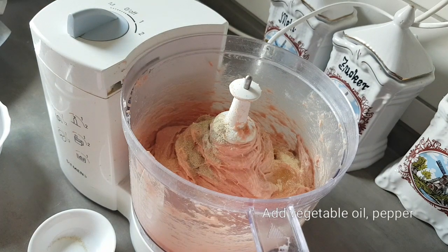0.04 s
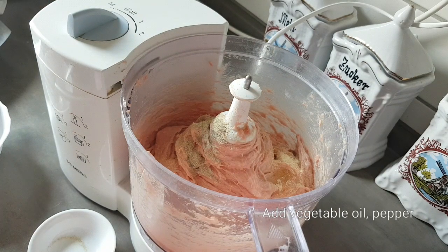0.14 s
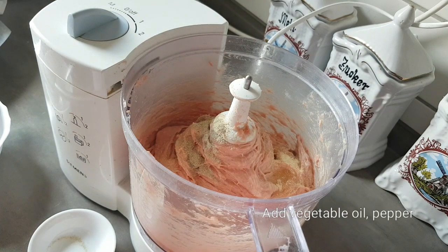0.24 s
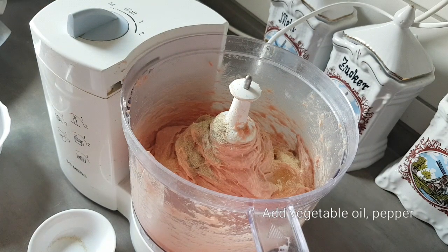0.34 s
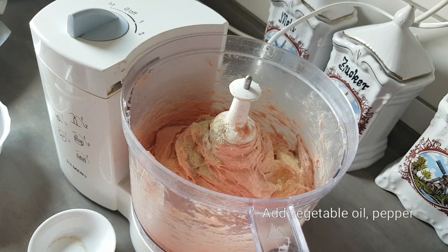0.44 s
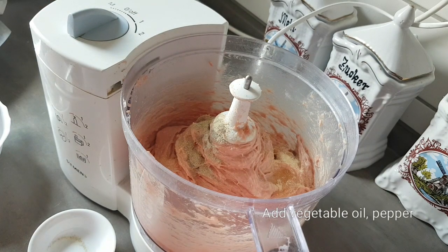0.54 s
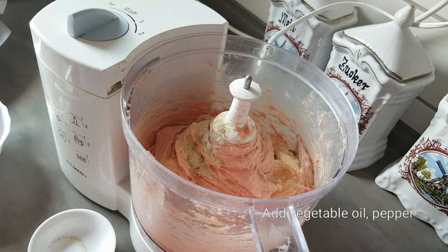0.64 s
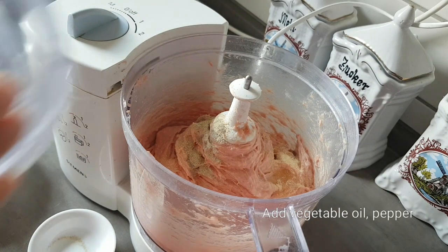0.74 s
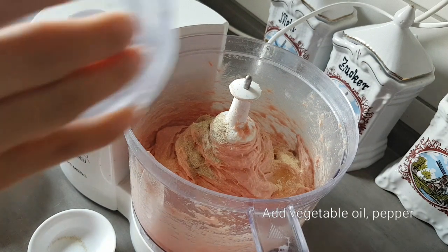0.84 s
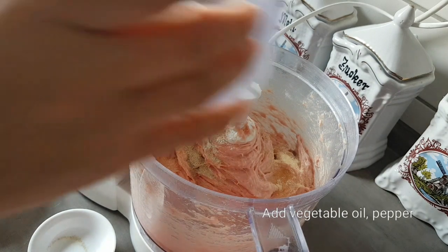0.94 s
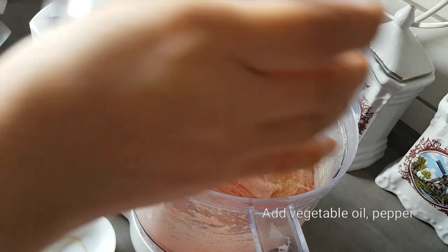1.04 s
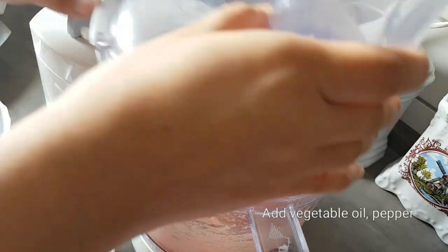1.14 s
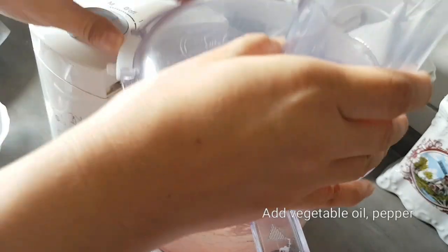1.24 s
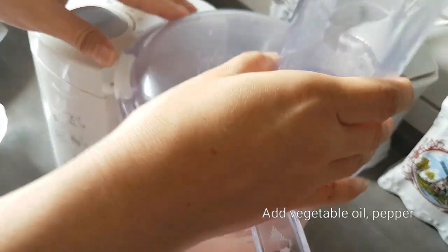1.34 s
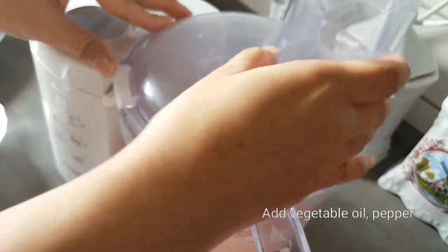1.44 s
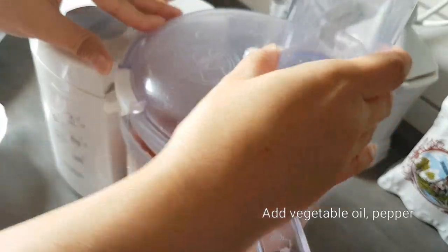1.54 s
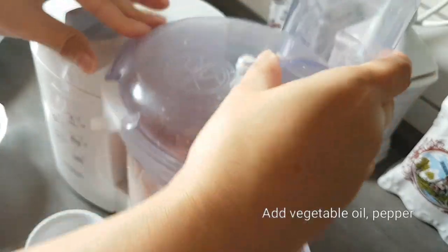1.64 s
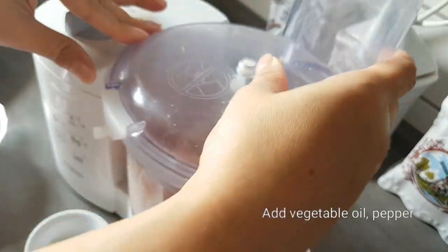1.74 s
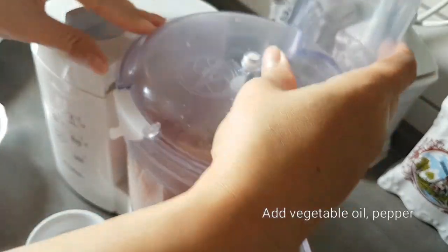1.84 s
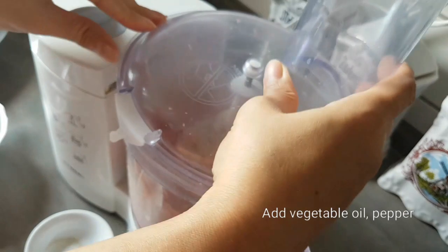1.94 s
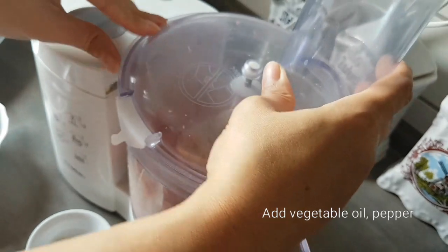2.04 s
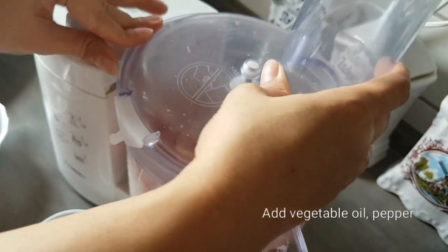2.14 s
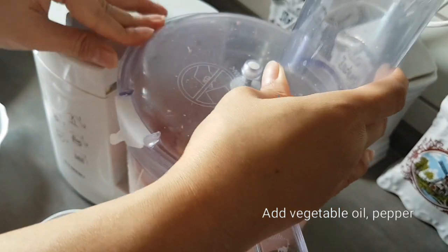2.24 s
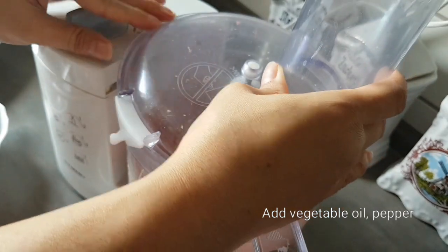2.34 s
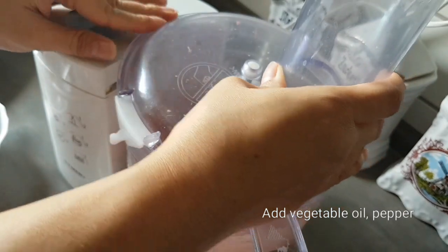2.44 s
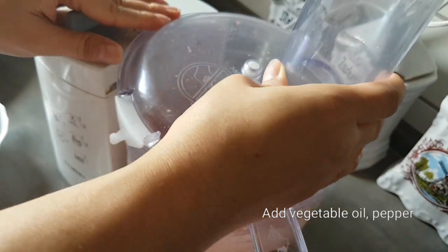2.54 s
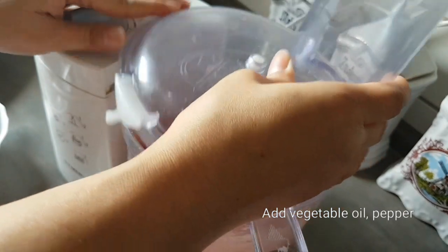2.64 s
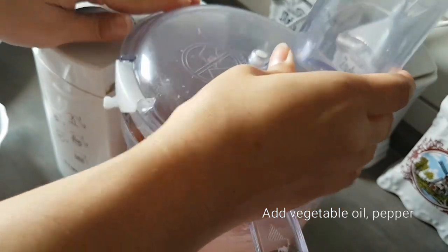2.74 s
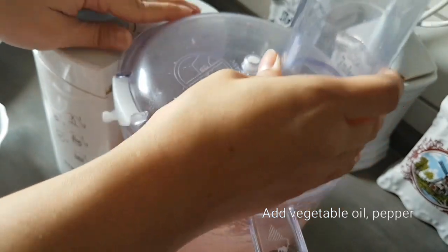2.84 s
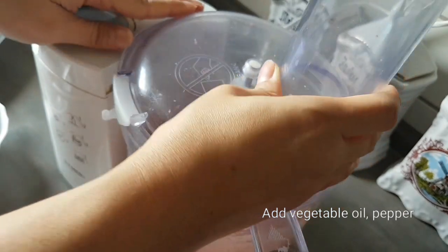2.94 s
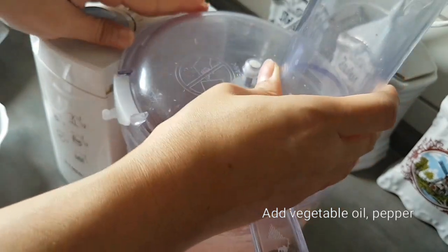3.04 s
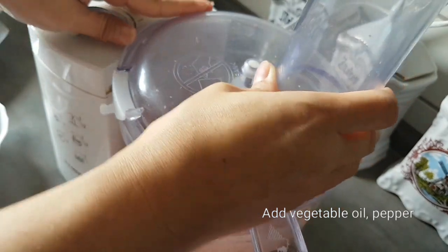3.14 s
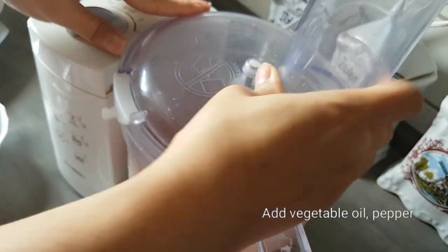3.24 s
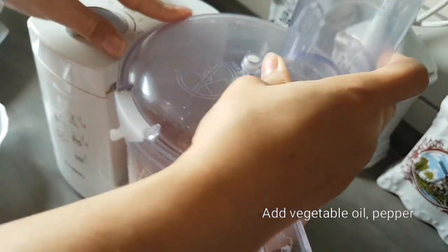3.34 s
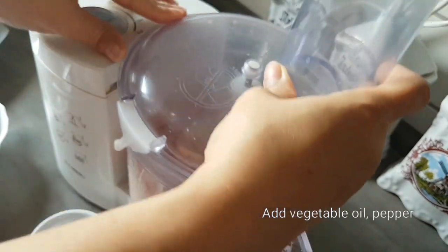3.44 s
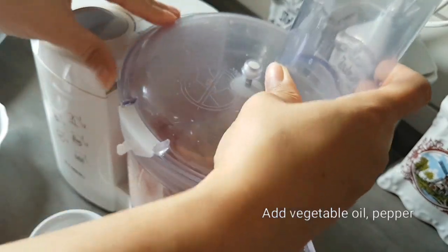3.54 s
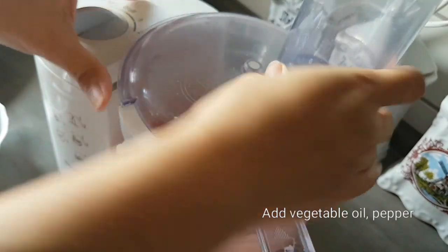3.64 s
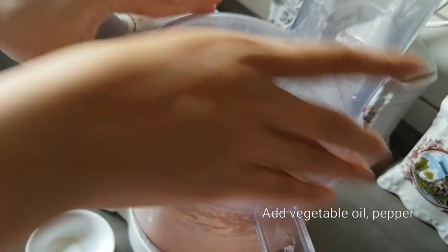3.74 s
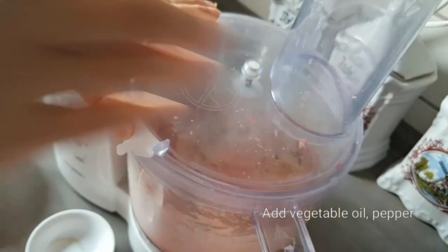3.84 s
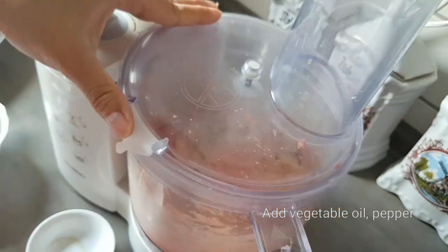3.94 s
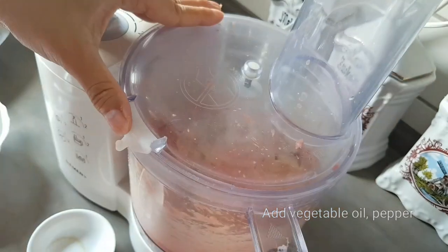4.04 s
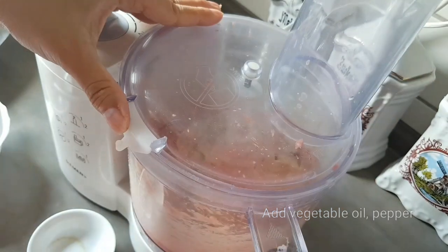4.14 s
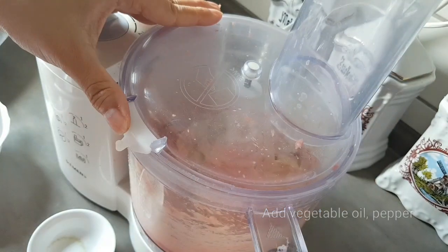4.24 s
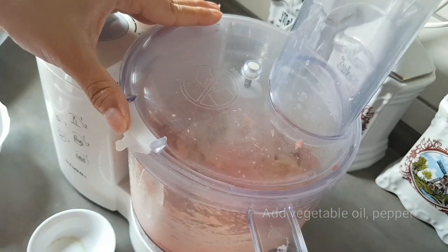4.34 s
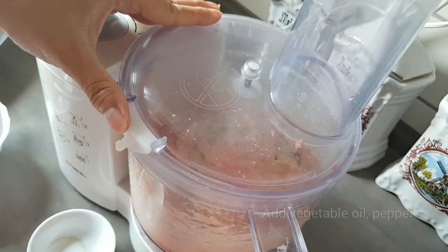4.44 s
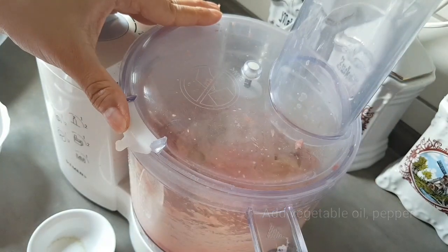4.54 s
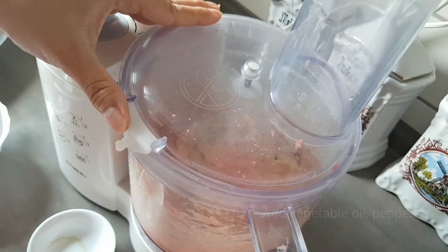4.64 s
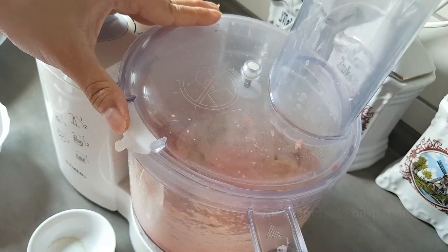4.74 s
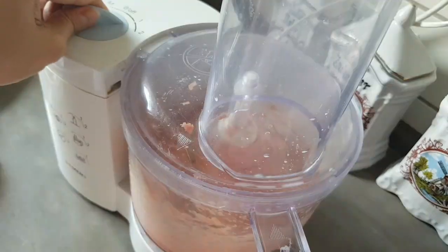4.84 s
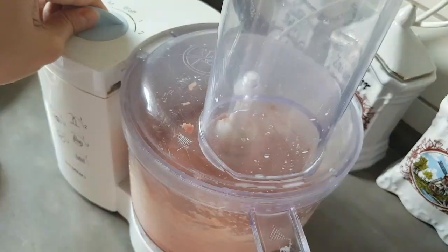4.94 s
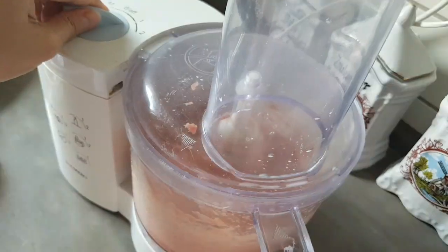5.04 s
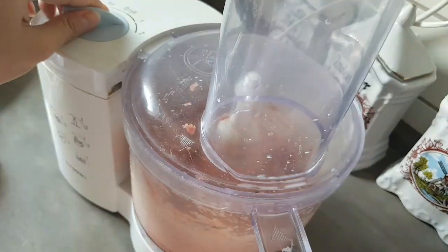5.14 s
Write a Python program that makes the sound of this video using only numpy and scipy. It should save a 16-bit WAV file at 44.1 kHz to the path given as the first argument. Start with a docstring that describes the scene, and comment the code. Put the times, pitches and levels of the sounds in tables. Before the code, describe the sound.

Close stereo microphones catch a lid being fitted to a plastic bowl: light counter rubbing, a soft tick, then quick boxy clacks with dry scraping between them. The knocks grow lower and tighter as it seats and locks. After a few faint taps the quiet room tone cuts out briefly, and an electric motor starts with hum, gear noise and a climbing whine at the very end.

```python
"""A plastic lid lands on a food processor bowl, rattles round the rim and snaps into its lock in a quiet kitchen.
Each knock is impact excitation: a noise crack, a dense rattle and dying modes of lid and bowl.
Friction noise makes the nudges, rim scrapes and hand strokes; small knocks mark where the rim catches.
After a brief silence the motor starts, with a mains hum and harmonics of a rising shaft speed.
Early echoes and a diffuse tail give the room, over low air noise with a faint hum."""
import sys
import numpy as np
from scipy import signal
from scipy.fft import rfft, irfft
from scipy.io import wavfile
from scipy.ndimage import uniform_filter1d

SR = 44100
rng = np.random.default_rng(int(sys.argv[2]) if len(sys.argv) > 2 else 0)


def master_out(mix):
    """Clip the mix to full scale and print it as 16-bit PCM to the path in sys.argv[1]."""
    frames = np.transpose(np.atleast_2d(mix))
    ceiling = np.clip(frames, -1, 1)
    pcm = np.round(ceiling * 32767).astype(np.int16)
    wavfile.write(sys.argv[1], SR, pcm)


N = 229094
TIME = np.arange(N) / SR  # s

# A well seated lid rings low and short and passes the blow to the housing as a thud;
# a loose one rings higher and longer. Looseness is counted in octaves above SEATED_HZ.
SEATED_HZ, SEATED_T60_S, T60_S_PER_OCTAVE = 280.4, 0.14, 0.045
SEATED_THUD_DB, THUD_DB_PER_OCTAVE, LOOSE_THUD_DB = -8, -32, -23  # against the body; the last is the floor
# Levels against the dense rattle before colouring, at a clack as strong as the body;
# the main note hardly follows the clack, the clear modes follow it closely.
NOTE_DB, NOTE_PER_CLACK_DB = -9, 0.02
MODES_DB, MODES_PER_CLACK_DB = -8.5, 0.74
# Blows of the lid on the bowl. Each row: start in seconds, target body level in dB, then hollow clack,
# snap of the rim and edge tick in dB over the body, main note in Hz.
LID_KNOCKS = [(1.4477, -54, -1, 4, -5.5, 590), (1.6398, -24, -9.5, -3, -14.5, 430),
              (1.66, -20.5, -17.5, -20, -34.5, 441.6), (1.7768, -32, -11, -17.5, -23, 319),
              (1.787, -40, -10, -5.5, -19, 300), (1.9329, -26, -12.5, -14.5, -25, 357),
              (1.9454, -20, -9.5, -17, -24, 544.3), (1.9916, -33, -7.5, -13.5, -22, 429),
              (2.0945, -37, -14.5, -17, -22, 432), (2.1553, -33, -6, -11.5, -18.5, 582),
              (2.1827, -34.5, -5.5, -6, -25.5, 303), (2.265, -37, -17.5, -19, -33, 327.5),
              (2.346, -33.5, -19, -27, -32, 318.4), (2.369, -34, -8.5, -16.5, -29.5, 548),
              (2.471, -55, -1.5, -0.5, -14, 301), (2.496, -47.5, -8.5, -10.5, -19.5, 322),
              (2.6201, -44, -20, -32.5, -30.5, 280), (2.934, -37, -19, -15.5, -23.5, 296),
              (2.949, -32, -10.5, -9, -17, 361.3), (3.0463, -23.5, 0.5, -4, -20, 321.6),
              (3.1469, -28, -15.5, -15, -21, 315.5), (3.2304, -24, -9.5, -10.5, -11.5, 339.7),
              (3.4228, -50, -12.5, -8, -13, 288), (3.455, -60, -13, -1.5, -4, 288),
              (3.504, -45, -7.5, -14.5, -18, 271), (3.526, -42, -8.5, -16.5, -24, 286),
              (3.618, -38.5, -19, -19, -20, 257), (3.7791, -25, -15, -13.5, -31.5, 282.5),
              (3.792, -25, -23.5, -41, -44, 290.2), (3.917, -54.5, -2, -9, -20.5, 254),
              (4.042, -44, -8.5, -18, -27, 296), (4.3493, -44.5, -11, -12, -21, 267.3)]


def knocks():
    """Impact excitation: the lid lands, rattles round the rim and snaps home, its seating setting the ring."""
    out = np.zeros((2, N))
    for start, body, clack, snap, tick, note_hz in LID_KNOCKS:
        loose = np.log2(note_hz / SEATED_HZ)
        thud = max(SEATED_THUD_DB + THUD_DB_PER_OCTAVE * loose, LOOSE_THUD_DB)
        bands_db = body + np.array([thud, 0, clack, snap, tick])
        note_db = NOTE_DB + NOTE_PER_CLACK_DB * clack
        modes_db = MODES_DB + MODES_PER_CLACK_DB * clack
        t60 = SEATED_T60_S + T60_S_PER_OCTAVE * loose
        add(out, start, knock(bands_db, note_hz, note_db, modes_db, t60))
    return out


# Resonances of lid and bowl. Each row: frequency in Hz, relative level in dB, t60 in seconds.
LID_BOWL_MODES = [(98.8, -4.5, 0.2), (141, -4.5, 0.23), (287.3, 4.5, 0.16), (373.3, -5, 0.13),
                  (415.6, -7.5, 0.1), (528, -7.5, 0.067), (560.8, -3.5, 0.15), (615.3, 2.5, 0.09),
                  (687, -3.5, 0.076), (888, -6.5, 0.11), (988, 2, 0.19), (1070, 2, 0.086), (1338, 7, 0.078),
                  (1380, -8, 0.047), (1817, 9.5, 0.048), (1940, -1, 0.075), (2284, -5, 0.11),
                  (2566, -7.5, 0.087), (3018, -9, 0.091), (3070, -3.5, 0.11), (3720, -8.5, 0.14),
                  (4790, -8.5, 0.12), (5220, -1, 0.071), (7600, 0, .13)]
# Starting colour of a blow on the plastic. Each row: frequency in Hz, gain in dB.
PLASTIC_COLOUR = [(30, -38.5), (48, -25.5), (75, -2), (100, -4.5), (215, -8), (290, -6), (610, -2),
                  (780, -1.5), (1000, -3.5), (1350, -5), (1580, -5), (1850, -6), (2500, -11.5),
                  (4000, -21.5), (7500, -34.5), (9500, -40.5), (14000, -42.5)]


def knock(bands_db, note_hz, note_db, modes_db, t60, size=16384):
    """Modal superposition: a broadband impact excites a dense rattle, one main note and the clear modes."""
    t = np.arange(size) / SR
    decay = amp(-60 * t / max(t60, 0.02))
    crack = amp(9 - 60 * t / 0.025)  # 9 dB over the rattle, t60 25 ms
    contact = 1 - np.exp(-t / 0.001)  # 1 ms rise
    dense = noise(size) * (crack + decay) * contact
    note = amp(note_db) * decay * np.sin(2 * np.pi * note_hz * t)
    clear = ring(LID_BOWL_MODES, t, scatter_db=1.5, detune=0.002)
    blow = colour(dense + note + amp(modes_db) * clear, PLASTIC_COLOUR)
    centres = np.sqrt(np.multiply(BAND_LIMITS[:-1], BAND_LIMITS[1:]))
    for _ in range(2):  # two passes bring the attack close to the wanted band levels
        correction_db = bands_db - attack_levels(blow)
        blow = colour(blow, np.transpose([centres, correction_db]))
    return blow


# Limits of the thud, body, clack, snap and tick bands. Each entry: frequency in Hz.
BAND_LIMITS = [60, 230, 750, 1500, 3500, 15000]


def attack_levels(x, size=1024):
    """Parseval's theorem: spectral power summed by band gives the dB levels at the start of a blow."""
    power = abs(rfft(x.mean(0)[:size], 4 * size)) ** 2 / (2 * size ** 2)
    hz = np.fft.rfftfreq(4 * size, 1 / SR)
    band_power = np.histogram(hz, BAND_LIMITS, weights=power)[0]
    return 10 * np.log10(band_power + 1e-20)


# Colour of the light click of a small hard object nearby. Each row: frequency in Hz, relative level in dB.
TICK_COLOUR = [(100, -3), (700, 3.5), (1500, 1), (2500, 1.5), (3900, 5.5), (4500, -2.5), (5600, -2),
               (7000, -4.5), (8800, -7), (10500, -15), (12300, -5), (15000, -3.5)]


def hard_click(start=0.4755, db=-41, size=12000):
    """Short contact: a brief impact has a wide spectrum, and a weaker rustle outlasts it."""
    t = np.arange(size) / SR
    contact = amp(-60 * t / 0.011)  # t60 11 ms
    rustle = amp(-10 - 60 * t / 0.19)  # 10 dB weaker, t60 190 ms
    sound = colour(noise(size) * (contact + rustle), TICK_COLOUR)
    out = np.zeros((2, N))
    add(out, start, amp(db) * sound / rms(sound[:, :256]))
    return out


# Strokes of the rim on the bowl or of skin on the lid.
# Each row: start in seconds, length in seconds, peak rubbing level in dB, peak hiss level in dB.
RUB_STROKES = [(0.916, 0.14, -74, -68), (1.05, .18, -75, -71.5), (1.647, 0.29, -48, -60),
               (1.89, 0.092, -37.5, -49.5), (2.04, 0.21, -46.5, -61.5), (2.318, 0.076, -46, -58),
               (2.603, .08, -89, -65.5), (2.819, 0.083, -69, -70), (3.353, .16, -55.5, -66),
               (3.505, 0.32, -52, -53.5), (3.85, 0.053, -80, -77), (3.946, 0.055, -58.5, -62)]
# Something nudged lightly over the counter. Each row: start in seconds, length in seconds, peak level in dB.
COUNTER_NUDGES = [(0.089, 0.081, -48.5), (0.147, 0.03, -44.5), (0.161, 0.059, -52), (0.213, 0.056, -54)]
# Colour of the plastic rubbing. Each row: frequency in Hz, relative level in dB.
RUB_COLOUR = [(35, -46.5), (60, -18), (107, -8), (205, -15.5), (422, -0.5), (753, -13.5), (898, -12.5),
              (1690, -25), (1980, -19.5), (2160, -16.5), (4000, -24.5), (5200, -45.5), (8800, -120)]
# Colour of the bright rubbing hiss. Each row: frequency in Hz, relative level in dB.
HISS_COLOUR = [(500, -25), (1500, 1.5), (3000, -1), (5000, -6.5), (7500, -6), (9500, -14.5), (13000, -9),
               (15000, -21.5)]
# Colour of the drag over the counter. Each row: frequency in Hz, relative level in dB.
COUNTER_DRAG_COLOUR = [(35, -47), (60, -39), (93, -1), (317, -17.5), (418, -18), (727, -10), (1080, -22.5),
                       (1520, -5.5), (1670, -12), (1790, -17), (3500, -25.5), (13400, -41), (15000, -52)]
# Resonances of the dragged body. Each row: frequency in Hz, relative level in dB, t60 in seconds.
COUNTER_DRAG_MODES = [(108, -9, 0.22), (610, -18, 0.15), (1520, -6, 0.066), (1790, 1.5, 0.075)]
SKID_HISS_DB = -8.5  # hiss of a skid against its rubbing


def handling():
    """Sliding friction: contact pressure sets the level of nudges, rim scrapes and hand strokes."""
    dragging = sum(amp(db) * stroke(start, length) for start, length, db in COUNTER_NUDGES)
    rubbing = skids()
    hissing = amp(SKID_HISS_DB) * rubbing
    for start, length, rub_db, hiss_db in RUB_STROKES:
        pressure = stroke(start, length)
        rubbing = rubbing + amp(rub_db) * pressure
        hissing = hissing + amp(hiss_db) * pressure
    drag = dragging * friction(COUNTER_DRAG_COLOUR, COUNTER_DRAG_MODES, modes_db=-11.5, grain_db=2.0)
    rub = rubbing * friction(RUB_COLOUR, LID_BOWL_MODES, modes_db=-9.5, grain_db=3.0)
    hiss = hissing * friction(HISS_COLOUR, LID_BOWL_MODES, modes_db=-18, grain_db=0.5)
    return drag + rub + hiss + chatter(rubbing)


def stroke(start, length, arch=1.03):
    """Pressure envelope: one stroke swells and fades as a power of a half sine."""
    along = (TIME - start) / length
    inside = (along > 0) & (along < 1)
    out = np.zeros(N)
    out[inside] = np.sin(np.pi * along[inside]) ** arch
    return out


# Rubbing against the knock's body level, before rise and decay; a looser lid skids louder.
SKID_DB, SKID_DB_PER_OCTAVE = -23.5, 6.5
SKID_RISE_S, SKID_T60_S = 0.015, 0.32


def skids():
    """Incoherent summation: the rim skids on after every knock, and overlapping skids add in power."""
    t = np.arange(SR) / SR
    settle = (1 - np.exp(-t / SKID_RISE_S)) * amp(-60 * t / SKID_T60_S)
    power = np.zeros((1, N))
    for start, body, *_, note_hz in LID_KNOCKS:
        db = body + SKID_DB + SKID_DB_PER_OCTAVE * np.log2(note_hz / SEATED_HZ)
        add(power, start, (amp(db) * settle[None]) ** 2)
    return np.sqrt(power)


def friction(spectrum, modes, modes_db, grain_db, size=8192):
    """Slip noise exciting resonance: slips of uneven size ring the rubbed body; scaled to unit RMS."""
    grains = np.minimum(rng.exponential(1, N // 64 + 1), 4)
    slips = noise(N) * amp(grain_db * np.repeat(grains, 64)[:N])  # a new size every 64 samples
    body = ring(modes, np.arange(size) / SR, scatter_db=3.5, detune=0)
    rung = signal.oaconvolve(slips, body / np.linalg.norm(body[0]), axes=1)[:, :N]
    sound = colour(slips + amp(modes_db) * rung, spectrum)
    return sound / rms(sound)


CATCHES_PER_S = 50  # over all places together
WEAKEST_CATCH_DB, CATCH_SPREAD_DB = -10, 4  # drive against the rubbing, before the tap's own band levels
CATCH_LOW_HZ, CATCH_HIGH_HZ = 282, 646
# Target levels of one tap. Each entry: level in dB, for thud, body, clack, snap and tick in turn.
CATCH_BANDS_DB = [-15, -1.5, -8, -11.5, -21]


def chatter(rubbing, t60=0.08, places=4):
    """Random point process: the sliding rim catches at a few places, each tapping with its own note."""
    out = np.zeros((2, N))
    for note_hz in np.geomspace(CATCH_LOW_HZ, CATCH_HIGH_HZ, num=places):
        catches = rng.random(N) < CATCHES_PER_S / places / SR
        sizes = amp(WEAKEST_CATCH_DB + CATCH_SPREAD_DB * np.minimum(rng.exponential(1, N), 2))
        tap = knock(np.array(CATCH_BANDS_DB), note_hz, NOTE_DB, MODES_DB, t60, size=8192)
        out += signal.oaconvolve(rubbing * catches * sizes, tap, axes=1)[:, :N]
    return out


MOTOR_ON_S, TOP_WHINE_HZ = 5.089, 990
RUN_UP_S, FIRST_SPEED = 0.066, 0.13  # time constant; share of full speed at first
WHINE_DB, HUM_DB, GEARS_DB = -24.5, -34, -43.5  # before the run-up, flare and throb shape them
HUM_RISE_S, GEARS_RISE_S = 0.018, 0.012  # time constants
# Partials of the whine. Each row: multiple of the whine frequency, relative level in dB.
WHINE_PARTIALS = [(.75, 6), (1, 13.5), (1.5, -5), (2, 1), (2.5, -23), (3, -27)]
# Partials of the motor hum. Each row: frequency in Hz, relative level in dB.
HUM_PARTIALS = [(100, 1), (150, -11.5), (200, -28), (300, -18)]
# Resonances of the gear housing. Each row: frequency in Hz, level in dB.
GEAR_COLOUR = [(76, -34.5), (130, -23.5), (205, -13), (543, -6.5), (650, -21), (718, -7), (841, -18),
               (1560, -16), (1790, -22.5), (5230, -35.5), (15000, -71)]


def motor(throb=0.21, waver=0.0355):
    """Harmonic synthesis: mains torque pulses hum and modulate a whine that climbs with shaft speed."""
    since = np.maximum(TIME - MOTOR_ON_S, 0)
    speed = 1 - (1 - FIRST_SPEED) * np.exp(-since / RUN_UP_S)
    whine_hz = TOP_WHINE_HZ * speed
    hum = sum(amp(db) * np.sin(2 * np.pi * hz * (TIME - MOTOR_ON_S)) for hz, db in HUM_PARTIALS)
    torque = 1 + throb * np.sin(2 * np.pi * HUM_PARTIALS[0][0] * since)
    wander = uniform_filter1d(rng.standard_normal(N), size=150)
    turns = np.cumsum(whine_hz * (1 + waver * wander / rms(wander))) / SR
    whine = sum(amp(db) * np.sin(2 * np.pi * k * turns) for k, db in WHINE_PARTIALS)
    gears = friction(GEAR_COLOUR, LID_BOWL_MODES, modes_db=-14.0, grain_db=-0.5)
    # the whine grows with speed and flares as it crosses the resonances of the gear housing
    flare = speed ** 2 * amp(WHINE_DB + read(GEAR_COLOUR, whine_hz))
    shaft_whine = flare * whine / rms(whine)
    gear_noise = amp(GEARS_DB) * speed ** 0.24 * gears  # brushes and gears
    moving = (shaft_whine + gear_noise) * (1 - np.exp(-since / GEARS_RISE_S))
    housing_hum = amp(HUM_DB) * (1 - np.exp(-since / HUM_RISE_S)) * hum / rms(hum)
    return housing_hum + torque * moving


# Echoes off the counter, housing and wall.
# Each row: delay to the left microphone in seconds, delay to the right in seconds, level in dB.
SURFACE_ECHOES = [(.0021, 0.003, -18.5), (.0043, 0.005, -21), (.0072, .0079, -17)]


def nearby_surfaces(x, above_hz=1500):
    """Early reflection: small hard surfaces throw back the treble a few milliseconds late."""
    treble = signal.sosfilt(signal.butter(2, above_hz, "high", fs=SR, output="sos"), x)
    out = np.zeros((2, N))
    for *delays, db in SURFACE_ECHOES:
        for ear, delay in enumerate(delays):
            add(out[ear:ear + 1], delay, amp(db) * treble[[ear]])
    return out


# Decay of the room. Each row: frequency in Hz, t60 in seconds.
KITCHEN_T60 = [(100, 0.54), (400, 0.25), (1500, 0.25), (5000, 0.23), (14000, 1)]


def kitchen(x, onset=0.004, size=256):
    """Diffuse reverberation: noise builds quickly and decays exponentially at a rate set by frequency."""
    hz, t, z = signal.stft(noise(SR // 2), SR, nperseg=size)
    decay = amp(-60 * t / read(KITCHEN_T60, hz)[:, None])
    z = z * decay * (1 - np.exp(-t / onset))
    tail = signal.istft(z, SR, nperseg=size)[1]
    return signal.fftconvolve(x, tail / np.linalg.norm(tail[0]), axes=1)[:, :N]


# Colour of the quiet kitchen. Each row: frequency in Hz, relative level in dB.
AIR_COLOUR = [(12, -35.5), (20, -14), (22, -13.5), (100, -1), (128, -8.5), (178, -7), (217, -15.5),
              (337, -8.5), (377, -18), (620, -18.5), (1140, -24), (2690, -26.5), (4430, -32.5),
              (13800, -38), (15000, -39.5)]


def air(wash_db=-63, hum_hz=100, hum_db=-71):
    """Stationary background noise: a coloured room wash with a faint steady mains hum."""
    wash = colour(noise(N), AIR_COLOUR)
    hum = amp(hum_db) * np.sin(2 * np.pi * hum_hz * TIME)
    return amp(wash_db) * wash / rms(wash) + hum


# Likeness of the two microphones. Each row: frequency in Hz, left-right correlation as a ratio.
LIKENESS = [(60, 0.93), (300, 0.77), (600, 0.7), (1200, 0.11), (2200, 0.05), (14000, 0.032)]


def noise(size):
    """Spatial coherence: white noise at two microphones, alike in the bass and unrelated in the treble."""
    a, b = rfft(rng.standard_normal((2, size)))
    same = np.clip(read(LIKENESS, np.fft.rfftfreq(size, 1 / SR)), -1, 1)
    return irfft(np.array([a, same * a + np.sqrt(1 - same ** 2) * b]), size)


def ring(modes, t, scatter_db, detune):
    """Modal decay: damped sines of alternating sign, scattered in strength, tuning and phase between ears."""
    hz, db, t60 = np.transpose(modes)[:, :, None]
    strength, shift, side = rng.standard_normal((3, len(modes), 1))
    apart = side * np.arccos(np.clip(read(LIKENESS, hz), -1, 1)) / 2
    sign = (-1) ** np.arange(len(modes))[:, None]
    fade = sign * amp(db + scatter_db * strength - 60 * t / t60)
    phase = 2 * np.pi * hz * (1 + detune * shift) * t
    return np.array([(fade * np.sin(phase + ear * apart)).sum(0) for ear in (-1, 1)])


def colour(x, points, size=4096):
    """Minimum-phase filtering: a causal filter with the given spectrum."""
    log_gain = np.log(amp(read(points, abs(np.fft.fftfreq(size, 1 / SR)))))
    response = np.exp(np.conj(signal.hilbert(log_gain)))
    taps = np.fft.ifft(response).real[:size // 2]
    return signal.fftconvolve(x, taps[None], axes=1)[:, :x.shape[1]]


def read(points, hz):
    """Logarithmic frequency scale: a table interpolated over log frequency."""
    f, value = np.transpose(points)
    return np.interp(np.log(hz + 1), np.log(f + 1), value)


def add(mix, start, sound):
    """Superposition: mixes a sound in at a start time in seconds."""
    part = mix[:, round(start * SR):][:, :sound.shape[1]]
    part += sound[:, :part.shape[1]]


def amp(db):
    """Decibel law: level to amplitude gain."""
    return 10 ** (np.asarray(db) / 20)


def rms(x):
    """Mean power: root mean square."""
    return np.sqrt(np.mean(x ** 2) + 1e-20)


# Level difference of the microphones. Each row: frequency in Hz, left minus right in dB.
MIC_BALANCE = [(60, -1.5), (150, -1.5), (350, 4), (550, -1.5), (1000, 0.5), (2500, -1.5), (5000, -2.5),
               (7500, -3.5), (10000, 3.5), (14000, 1.5)]


def scene(room_db=-16):
    """Direct and reflected sound: all sources in the room, at two slightly unequal microphones."""
    near = hard_click() + knocks() + handling() + motor()
    mix = near + nearby_surfaces(near) + amp(room_db) * kitchen(near) + air()
    ears = []
    for ear, side in enumerate((1, -1)):
        tilt = [(hz, side * db / 2) for hz, db in MIC_BALANCE]
        ears.append(colour(mix[[ear]], tilt))
    return np.concatenate(ears)


SILENT_FROM_S, SILENT_TO_S = 4.993, 5.088
EDGE_HZ = 14900


def record(dry):
    """Gating and band limiting: silence before the motor, a 3 ms fade at the end, then a low-pass filter."""
    sounding = 1. * ((TIME < SILENT_FROM_S) | (TIME > SILENT_TO_S))
    gate = uniform_filter1d(sounding, size=64)
    gate = gate * np.minimum((TIME[-1] - TIME) / 0.003, 1)
    low_pass = signal.firwin(301, EDGE_HZ, window=("kaiser", 8), fs=SR)
    return signal.oaconvolve(dry * gate, low_pass[None], "same", axes=1)


dry = scene()
out = record(dry)
master_out(out)
```